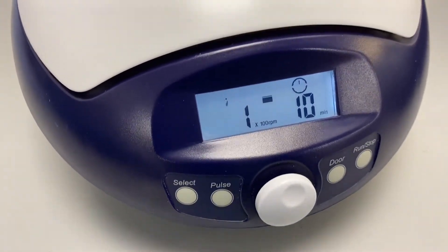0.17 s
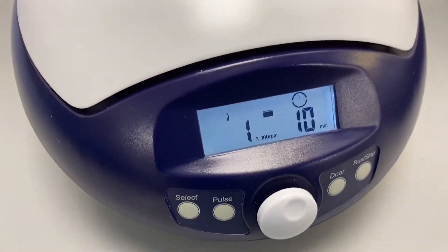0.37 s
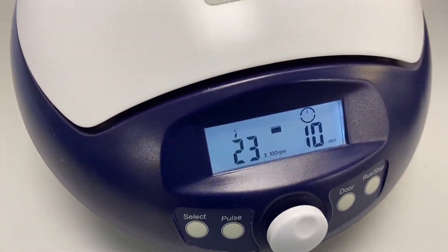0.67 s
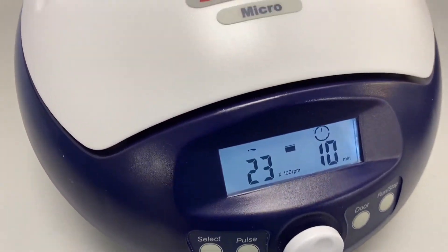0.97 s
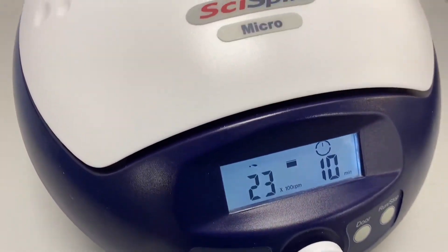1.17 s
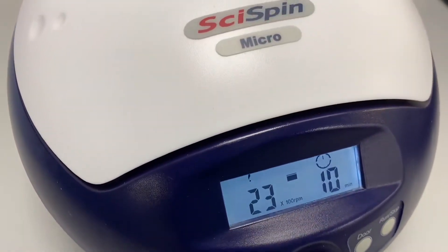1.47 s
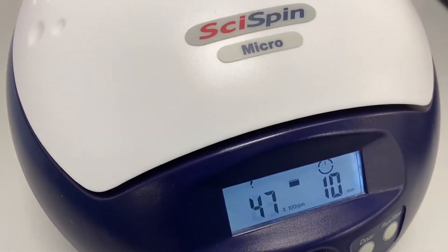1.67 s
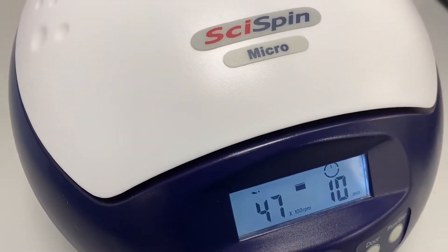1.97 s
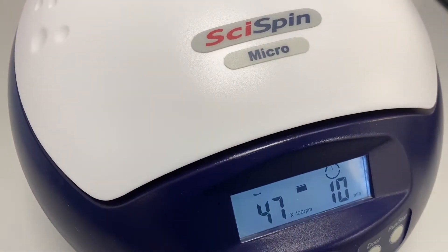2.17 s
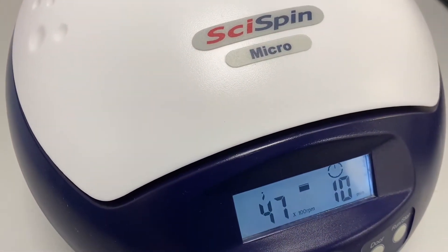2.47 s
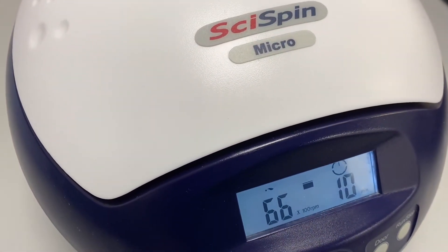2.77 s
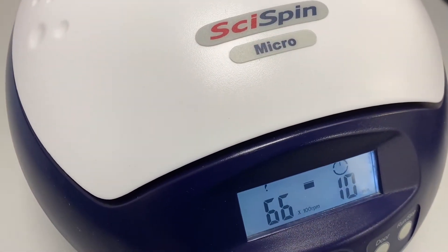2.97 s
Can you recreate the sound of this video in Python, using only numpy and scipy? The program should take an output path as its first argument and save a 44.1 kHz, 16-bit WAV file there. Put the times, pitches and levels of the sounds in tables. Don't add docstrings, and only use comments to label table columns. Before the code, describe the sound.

A small bench centrifuge accelerates close to the microphone, its electric whine climbing smoothly with a noisy midrange buzz, while air rush under the lid grows over low room ventilation rumble and faint hum.

```python
import sys
import numpy as np
from scipy import signal
from scipy.fft import rfft, irfft
from scipy.io import wavfile

SR = 44100
rng = np.random.default_rng(int(sys.argv[2]) if len(sys.argv) > 2 else 0)


def master_out(mix):
    frames = np.transpose(np.atleast_2d(mix))
    ceiling = np.clip(frames, -1, 1)
    pcm = np.round(ceiling * 32767).astype(np.int16)
    wavfile.write(sys.argv[1], SR, pcm)


def natural_amplitude(level_db):
    exponent = np.asarray(level_db, float) / 20
    return 10 ** exponent


N = 137151
PAD = 8192

# t/s, rate/Hz
SHAFT_SPEED = [(0, 44.0), (.2, 51.5), (.4, 59.6), (.55, 65.0), (.7, 70.87), (.9, 78.65), (1.1, 85.62),
               (1.4, 95.24), (1.6, 101.1), (1.8, 107.38), (2.0, 113.3), (2.2, 118.9), (2.5, 126.55),
               (2.8, 133.9), (3.11, 140.9)]
# level/dB at the 20th harmonic, slope/dB per harmonic
PULL_PATTERN = [(-56.5, -.3), (-44.5, -1.0), (-56, -.4), (-46, -.35), (-44, -.22), (-57, -.9)]
# harmonic, level/dB, growth/dB per doubling of speed
LOW_HARMONICS = [(1, -58, 6), (3, -56, 18), (6, -65, 20), (7, -70, 6), (12, -64, 3)]
# f/Hz, level/dB
PULSING_MODES = [(1800, -26), (2280, -19), (2390, -8), (2500, -5), (2610, 0), (2655, -11), (2760, -16),
                 (3200, -32)]
FORWARD_MODES = [(1800, -34), (2250, -24), (2295, -11), (2350, -1), (2450, 0), (2615, -4), (2650, -21),
                 (3000, -36)]
BACKWARD_MODES = [(1800, -26), (2110, -18), (2150, -1), (2260, 0), (2310, -7), (2390, -2), (2600, -5),
                  (2800, -22)]
# f/Hz, width/Hz, level/dB
HOUSING_RING = [(2190, 136, 3.5), (2475, 250, -9), (2434, 270, 6), (2587, 63, 0.5)]
# f/Hz, density/dB per Hz
RUSH_COLOUR = [(150, -3), (350, 0), (600, -10), (1700, -14.5), (5000, -33), (8000, -28.5), (12500, -34.5),
               (16500, -30)]
# f/Hz, width/Hz, level/dB
LID_RESONANCES = [(278, 24, 2), (359, 43, 4), (4900, 280, 7.5), (6400, 250, 4), (7880, 150, 5.5),
                  (8300, 430, 3.5), (11930, 230, 8.5), (12670, 520, 16), (14700, 200, 7)]
# f/Hz, density/dB per Hz
VENT_COLOUR = [(25, -19), (45, -10.5), (70, -0.5), (150, -6), (240, -17.5), (800, -21), (1100, -29),
               (2100, -33)]
# f/Hz, level/dB
VENT_TREBLE = [(2100, 1), (4500, -2.5), (6000, -13), (16000, -15)]
# f/Hz, width/Hz, level/dB
DUCT_RESONANCES = [(81, 39, 3), (117.3, 10, -6.5), (140.4, 6.7, 3.5), (282, 31, 6), (354, 13, -4),
                   (885, 67, 4.5), (1116, 17, 8), (1311, 67, 7), (1494, 32, 8.5), (1679, 100, 6.5),
                   (1840, 53, 3.5), (2095, 100, -19), (2880, 50, 2.5), (3993, 100, 5), (4300, 48, 0)]
# f/Hz, level/dB rms, width/Hz
HUM_LINES = [(199.2, -44, 1.5), (657, -57, 3)]
# f/Hz, share/0-1
MIC_COMMON = [(80, .99), (250, .89), (500, .5), (1500, .08), (2700, .55), (4500, .55), (6200, .47),
              (7600, .91)]
# f/Hz, phase/rad
MIC_LEAD = [(0, 0), (1550, 1.2), (1980, -.8), (2580, .7), (4050, .2), (6850, 0), (16500, -14.3)]
# f/Hz, level/dB
MIC_TILT = [(60, 1.5), (130, 1.6), (300, 1.3), (700, 2.6), (1400, .9), (2500, 2.3), (5000, 1), (9000, .1)]
# low f/Hz, high
# f/Hz, level/dB
WEAK_SUM = [(8300, 9600, -1), (12750, 13000, -2), (13000, 13750, -25), (15750, 22050, -70)]
WEAK_DIFFERENCE = [(6330, 7550, -7), (10350, 11700, -7), (13900, 14550, -2), (14550, 15000, -3),
                   (15000, 22050, -70)]

FLUTTER_HZ = 14.0


def motor(speed, doublings):
    left_db, lead_s = 1.5, 2e-5
    hz = bins()
    turn = 2 * np.pi * np.cumsum(speed) / SR
    tones = whine(speed, turn) + low_tones(turn, doublings)
    near = natural_amplitude(left_db / 2) * np.exp(1j * np.pi * hz * lead_s)
    sides = rfft(tones, N + PAD) * ports(hz) * [near, 1 / near]
    return irfft(sides, N + PAD)[:, :N] + buzz(doublings)


def whine(speed, turn):
    flutter_db = 1.5
    fade_from, fade_db = 40, -.4
    orders = range(13, 63)
    wobbles = drift(FLUTTER_HZ, count=50)
    starts = rng.uniform(0, 2 * np.pi, 50)
    total = 0
    for k, wobble, start in zip(orders, wobbles, starts):
        db, slope = PULL_PATTERN[k % 6]
        modes = (PULSING_MODES, FORWARD_MODES, BACKWARD_MODES)[k % 3]
        level_db = db + 3 + slope * (k - 20)
        level_db = level_db + fade_db * max(0, k - fade_from)
        level_db = level_db + flutter_db * wobble + at_hz(modes, k * speed)
        total = total + natural_amplitude(level_db) * np.sin(k * turn + start)
    return total


def low_tones(turn, doublings):
    flutter_db = 3
    total = 0
    for (k, db, growth), wobble in zip(LOW_HARMONICS, drift(FLUTTER_HZ, count=5)):
        level_db = db + 3 + growth * doublings + flutter_db * wobble
        total = total + natural_amplitude(level_db) * np.sin(k * turn + k)
    return total


def buzz(doublings):
    level_db, per_doubling_db = -51.5, -2
    ring = noise(20 * np.log10(abs(housing(bins())) + 1e-9))
    return natural_amplitude(level_db + per_doubling_db * doublings) * ring


def housing(hz):
    return sum(natural_amplitude(db) / (1 + 1j * (hz - f) / (width / 1.5)) ** 2 for f, width, db in HOUSING_RING)


def rush(doublings):
    level_db, per_doubling_db = -43.5, 7
    hz = bins()
    colour = at_hz(RUSH_COLOUR, hz) - 12 * np.maximum(0, np.log2(150 / (hz + 1)))
    colour = colour + bumps(LID_RESONANCES, hz)
    return natural_amplitude(level_db + per_doubling_db * doublings) * noise(colour)


def ventilation(doublings):
    level_db, per_doubling_db = -31.5, 1.24
    hz = bins()
    colour = at_hz(VENT_COLOUR, hz) + at_hz(VENT_TREBLE, hz)
    colour = colour - 24 * np.maximum(0, np.log2(44 / (hz + 1)))
    colour = colour + bumps(DUCT_RESONANCES, hz)
    hum = 0
    for f, db, width in HUM_LINES:
        hum = hum + natural_amplitude(db) * noise(-20 * np.log10(1 + ((hz - f) / width) ** 2))
    return natural_amplitude(per_doubling_db * doublings) * (natural_amplitude(level_db) * noise(colour) + hum)


def noise(db_per_hz):
    hz = bins()
    white = rfft(rng.standard_normal((3, N + PAD)))
    share = np.clip(at_hz(MIC_COMMON, hz), 0, 1)
    mixed = np.sqrt(share) * white[0] + np.sqrt(1 - share) * white[1:]
    out = irfft(mixed * ports(hz) * natural_amplitude(db_per_hz), N + PAD)[:, :N]
    return out / np.sqrt(np.mean(out ** 2))


def ports(hz):
    phase = np.interp(hz, column(MIC_LEAD, 0), column(MIC_LEAD, 1))
    left = np.exp(.5j * phase) * natural_amplitude(at_hz(MIC_TILT, hz) / 2)
    return np.array([left, 1 / left])


def bumps(resonances, hz):
    return sum(db * np.exp(-((hz - f) / width) ** 2) for f, width, db in resonances)


def drift(rate_hz, count):
    knots = int(N / SR * rate_hz) + 2
    places = np.linspace(0, knots - 1, N)
    return [np.interp(places, np.arange(knots), row) for row in rng.standard_normal((count, knots))]


def column(rows, k):
    return np.array(rows, float)[:, k]


def at_hz(rows, hz):
    return np.interp(np.log(hz + 1), np.log(column(rows, 0)), column(rows, 1))


def bins():
    return np.fft.rfftfreq(N + PAD, 1 / SR)


def scene():
    speed = np.interp(np.arange(N) / SR, column(SHAFT_SPEED, 0), column(SHAFT_SPEED, 1))
    doublings = np.log2(speed / 100)
    return motor(speed, doublings) + rush(doublings) + ventilation(doublings)


def top_cut(x):
    return signal.sosfilt(signal.butter(12, 16920, fs=SR, output="sos"), x)


def record(dry):
    left, right = rfft(dry, N + PAD)
    mid = (left + right) / 2 * band_gain(WEAK_SUM)
    side = (left - right) / 2 * band_gain(WEAK_DIFFERENCE)
    mix = irfft([mid + side, mid - side], N + PAD)[:, :N]
    return top_cut(mix)


def band_gain(bands):
    hz = bins()
    return natural_amplitude(sum(db * (hz > low) * (hz < high) for low, high, db in bands))


dry = scene()
out = record(dry)
master_out(out)
```